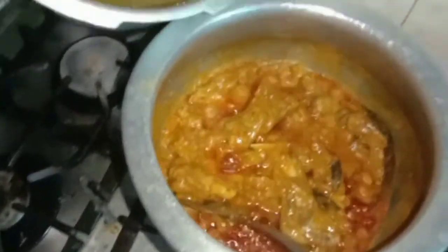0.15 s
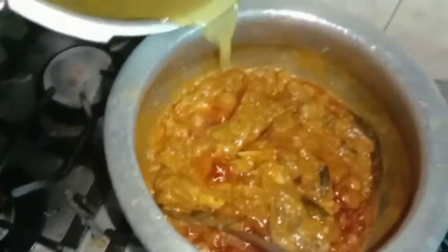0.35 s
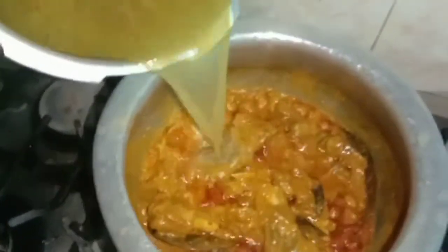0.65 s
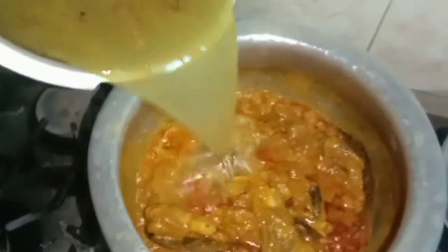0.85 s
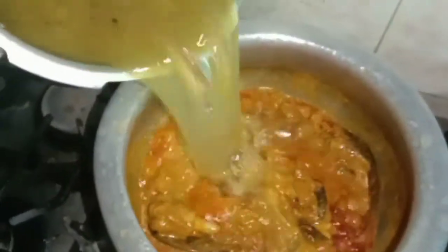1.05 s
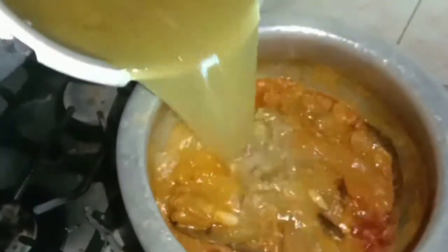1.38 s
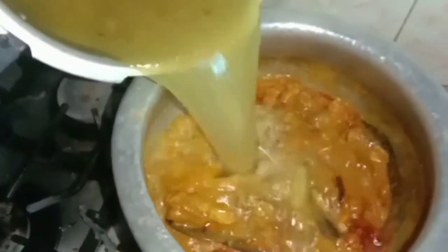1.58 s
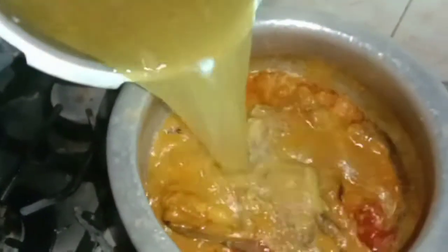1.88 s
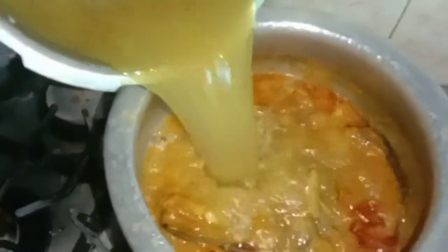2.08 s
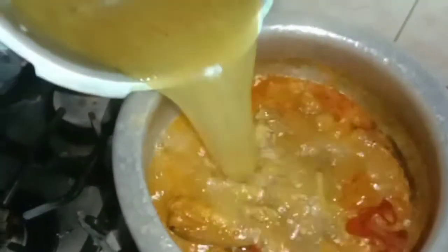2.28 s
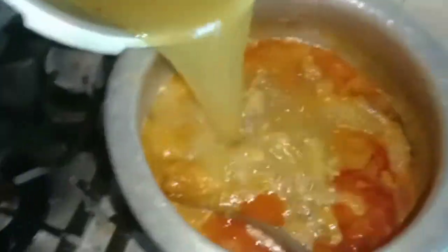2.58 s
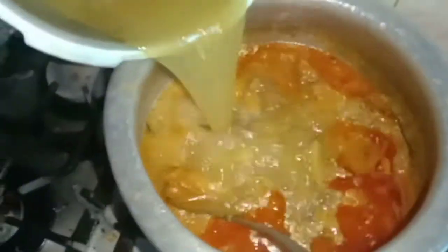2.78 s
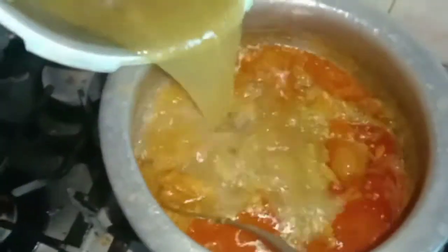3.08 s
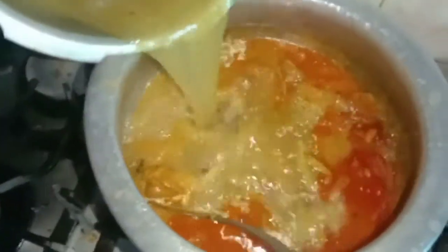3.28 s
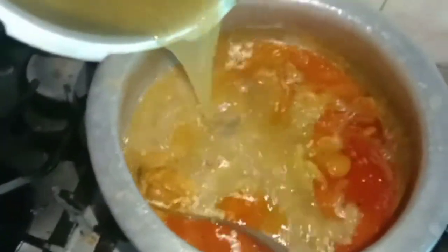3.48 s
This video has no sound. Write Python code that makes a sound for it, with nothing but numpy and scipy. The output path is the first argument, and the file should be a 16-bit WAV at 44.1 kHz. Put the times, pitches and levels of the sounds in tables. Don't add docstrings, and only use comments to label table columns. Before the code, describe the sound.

Broth poured into a metal pot of gravy starts as thin hiss and small bubbles, swells into dense crackling fizz after one second, then ends with a bowl-on-rim clank; close microphone in a home kitchen.

```python
import sys
import numpy as np
from scipy import signal
from scipy.fft import rfft, irfft
from scipy.io import wavfile
from scipy.ndimage import uniform_filter1d

SR = 44100
rng = np.random.default_rng(int(sys.argv[2]) if len(sys.argv) > 2 else 0)


def ratio(d):
    e = np.asarray(d, float) / 20
    return 10 ** e


def dump(signal):
    limited = np.clip(np.atleast_2d(signal).T, -1, 1)
    pcm = np.round(limited * 32767).astype(np.int16)
    wavfile.write(sys.argv[1], SR, pcm)


N = 160965
TIME = np.arange(N) / SR

# (frequency [Hz], level [dB])
ROOM_SPECTRUM = [(30, -16), (102, -11.5), (300, -19), (520, -19.5), (800, -20.5), (1300, -7.5), (1750, -22),
                 (2300, -31)]
# (time [s], level [dB], frequency [Hz], spell [s])
THUDS = [(0.0, -45, 117.4, 0.03), (.14, -42.5, 120.4, 0.058), (1.72, -49, 116.5, 0.23),
         (1.85, -42.5, 105, 0.02), (2.0, -55, 96, 0.07), (2.2, -53, 75, 0.034), (.34, -50.5, 216, 0.032),
         (2.77, -47, 118.2, 0.11), (2.9, -50, 97.7, 0.16), (3.49, -42, 117, 0.077)]
# (frequency [Hz], width [Hz], level [dB])
WALL_MODES = [(515.4, 48, -10.5), (1004, 28, -11), (1180, 37, -2.5), (1450, 39, -2.5), (2025, 97, -6.5)]
# (time [s], level [dB], frequency [Hz], spell [s])
HUMS = [(2.0, -35.5, 984, 0.13), (.01, -39, 1179, 0.12), (.2, -37.5, 487, .12), (.21, -29.5, 1225, 0.041),
        (.35, -35, 1590, 0.026), (.385, -40, 1550, 0.03), (.41, -40, 516, 0.09), (.73, -29.5, 1526, 0.032),
        (.73, -36, 1154, 0.032), (1.0, -38.5, 1180, 0.16), (1.19, -25, 1235, 0.014), (1.2, -34.5, 978, 0.2),
        (1.27, -30, 1474, 0.11), (1.4, -36.5, 521, .12), (1.505, -33, 964, 0.12),
        (1.67, -30.5, 1426, 0.056), (1.78, -32.5, 1182, 0.045), (2.008, -30.5, 1450, 0.021),
        (2.06, -35.5, 515, 0.028), (2.17, -37, 520, 0.087), (2.17, -34, 1180, 0.068),
        (2.385, -32, 985, 0.026), (2.439, -19.5, 1913, 0.0051), (2.925, -34, 1180, 0.023)]
# (time [s], level [dB], start frequency [Hz], end frequency [Hz], spell [s])
STEAM_POCKETS = [
    (.311, -27, 1750, 1330, .04),
    (.449, -32, 2600, 2050, .025),
    (.87, -25, 2600, 2000, .035),
    (1.68, -33, 1000, 1200, .04),
]
POCKET_SETTLING = [.03, .012, .006, .03]
# (frequency [Hz], level [dB], decay time T60 [s])
POT_MODES = [(138.7, -3, 0.37), (168.5, -1, 0.25), (217, 0.5, 0.31), (534, -5, 0.84), (665, -4.5, 0.63),
             (736, 9, 0.091), (947, -13, .2), (1043, 6.5, 0.16), (1084, -3, 0.56), (1143, 6, 0.18),
             (1270, 5.5, 0.11), (1365, -7.5, 0.62), (1633, -5, 0.23), (1590, -3.5, 0.14)]
# (frequency [Hz], level [dB], decay time T60 [s])
BOWL_MODES = [(2541, -20, .6), (2923, -9, .15), (3219, -13, .3), (4145, -9, .28), (4791, -17, .26),
              (4998, -12, 1.5), (5502, -13, .35), (6300, -14, .4), (7700, -20, .5), (9400, -27, .4)]
# (frequency [Hz], level [dB])
CLATTER_SPECTRUM = [(70, -1.5), (150, -4.5), (300, -9.5), (700, -1.5), (1200, -9), (2000, -15.5),
                    (5000, -17.5), (9000, -36.5)]
# (time [s], level [dB], frequency [Hz])
SMALL_BUBBLES = [(0.4258, -19.5, 5640), (0.5253, -20, 5650), (0.6445, -13, 5780), (1.3193, -9, 6080),
                 (1.618, -12.5, 5750), (1.9066, -14.5, 4740), (1.9325, -11.5, 6380), (2.211, -12.5, 6140),
                 (2.3606, -19, 5800), (2.602, -14.5, 5900), (2.7102, -15, 6600), (2.7233, -14, 5770),
                 (3.028, -16.5, 5870), (3.1595, -17.5, 6400), (3.1824, -16, 6330), (3.4324, -17, 5470),
                 (3.48, -15, 5380)]
# (time [s], level [dB], frequency [Hz])
MIDDLING_BUBBLES = [(0.0788, -22, 2980), (0.136, -17, 3070), (0.3726, -24.5, 2940), (0.738, -20, 3130),
                    (0.869, -21, 2660), (0.913, -27, 2640), (1.1228, -18, 3200), (1.1695, -21.5, 3160),
                    (1.23, -12, 3460), (1.5836, -14.5, 3130), (1.713, -13, 3280), (1.7796, -19.5, 3350),
                    (1.8657, -20.5, 2640), (1.9224, -15.5, 2640), (1.9402, -21, 2800),
                    (1.9653, -12.5, 2880), (2.0333, -15, 2770), (2.0504, -17.5, 2700),
                    (2.0787, -14.5, 3340), (2.092, -14, 3400), (2.1056, -15.5, 3230), (2.235, -17, 2700),
                    (2.2658, -14, 3080), (2.4506, -16, 2660), (2.4774, -14.5, 2850), (2.5314, -19.5, 2880),
                    (2.5775, -18, 3290), (2.615, -13.5, 2820), (2.6627, -16.5, 3480), (2.772, -16.5, 3030),
                    (2.864, -16.5, 2910), (2.8986, -14.5, 2930), (2.9706, -21.5, 2580), (3.0709, -17, 3100),
                    (3.2111, -14.5, 2730), (3.2538, -19.5, 2910), (3.405, -20.5, 2870), (3.418, -14, 2920)]
# (time [s], level [dB], frequency [Hz], spray level [dB])
BURSTS = [(0.1858, -12, 6600, -12.5), (0.3105, -9.5, 5550, -27), (0.6237, -12, 5800, -24),
          (0.7514, -9.5, 3260, -31), (1.005, -7.5, 3300, -24), (1.0919, -7.5, 5600, -16.5),
          (1.3003, -18, 5540, -20), (1.4625, -9, 5700, -17.5), (1.5662, -9.5, 6070, -7.5),
          (1.6335, -13, 6100, -22), (1.9067, -14, 2800, -26), (1.9924, -7.5, 3260, -32),
          (2.1877, -26, 3320, -20), (2.219, -6.5, 6220, -20), (2.3766, -4.5, 6100, -26),
          (2.3858, -4.5, 6400, -30), (2.564, -16.5, 3340, -30), (2.6956, -5.5, 3460, -30),
          (3.057, -15.5, 2980, -6), (3.0972, -18, 2700, -21), (3.4115, -10, 6290, -21),
          (3.493, -8, 5100, -20)]
# (time [s], fizz level [dB], spray level [dB])
BOIL = [(0, -33, -2.5), (.15, -28.5, -4.5), (.27, -32.5, -8), (.45, -32.5, -4.5), (.58, -33, -2.5),
        (.64, -31.5, -1.5), (.95, -27, -6), (1.2, -22.5, -5), (1.33, -17, -11), (1.46, -25.5, -3.5),
        (1.67, -22.5, -6.5), (2.3, -26.5, -5), (2.75, -27, -7), (3.2, -27, -7.5), (3.3, -34.5, -6.5),
        (3.46, -28, -5), (3.54, -28, -9), (3.6, -33.5, -11)]
# (frequency [Hz], level [dB])
FIZZ_SPECTRUM = [(1700, -7.5), (2300, -9), (3100, -1.5), (4300, -8), (6000, 0), (9200, -20.5), (14800, -3),
                 (15500, -13)]
# (time [s], level [dB])
FROTH_SHARE = [
    (.9, 0.5),
    (1.6, 0.5),
    (2.8, 2.5),
]
# (frequency [Hz], width [Hz], share [1], growth with filling [dB per dB])
AIR_CAVITY = [(2599, 205, 0.65, 2.95), (3200, 250, 0.96, -.7)]
# (time [s], half length [s], level [dB])
LULLS = [
    (0.603, 0.027, -5),
    (3.27, 0.024, -2),
]
# (frequency [Hz], width [Hz], share [1])
BAND_DIP = (4250, 360, 0.41)


def evened(x):
    return x / np.sqrt(np.mean(x ** 2) + 1e-20)


def noise(count=N):
    return rng.standard_normal(count)


def coloured(x, spectrum):
    hz = np.fft.rfftfreq(len(x), 1 / SR)
    f, db = np.transpose(spectrum)
    gain = ratio(np.interp(np.log(hz + 1), np.log(f + 1), db))
    return irfft(rfft(x) * gain, len(x))


def band(x, lo_hz, hi_hz):
    edges = [lo_hz, min(hi_hz, SR / 2.1)]
    return signal.sosfilt(signal.butter(3, edges, "band", fs=SR, output="sos"), x)


def resonate(x, hz, width):
    turn = np.exp(2j * np.pi * np.cumsum(hz * np.ones(len(x))) / SR)
    r = np.exp(-np.pi * abs(width) / SR)
    return 2 * (turn * signal.lfilter([1 - r], [1, -r], x / turn)).real


def drift(per_s):
    size = max(int(SR / per_s), 2)
    slow = uniform_filter1d(noise(), size, mode="wrap")
    slow = uniform_filter1d(slow, size, mode="wrap")
    return evened(slow - uniform_filter1d(slow, 5 * size))


def add(mix, s, sound):
    part = mix[round(s * SR):][:len(sound)]
    part += sound[:len(part)]


def room():
    return ratio(-50.5) * evened(coloured(noise(), ROOM_SPECTRUM + [(3000, -56)]))


def stove_rumble():
    return ratio(-58.5 + 1.7 * drift(6.4)) * evened(band(noise(), 27, 104)) * (TIME > 2.2)


def driven_spells(rows, width, rise_s, t60, lift_db):
    out, t = np.zeros(N), np.arange(16000) / SR
    for s, db, hz, spell in rows:
        envelope = np.minimum(t / rise_s, 1) * ratio(-60 * np.maximum(t - spell, 0) / t60)
        waver = hz * (1 + 0.0143 * evened(uniform_filter1d(noise(len(t)), size=1200)))
        tone = 0.99 * np.sin(2 * np.pi * np.cumsum(waver) / SR)
        rough = resonate(resonate(noise(len(t)), waver, width * hz), waver, width * hz)
        add(out, s, ratio(db + lift_db) * envelope * (tone + 0.69 * evened(rough)))
    return out


def stove_thuds():
    return driven_spells(THUDS, width=0.52, rise_s=0.0052, t60=0.32, lift_db=0.0)


def walls():
    hum = np.zeros(N)
    for hz, width, db in WALL_MODES:
        wander = hz * (1 + 0.021 * drift(7.6))
        mode = resonate(resonate(noise(), wander, width), wander, 3 * width)
        hum += ratio(db + 2.1 * drift(47)) * evened(mode)
    drowned = np.clip((TIME - 2.2) / 0.092, 0, 1)
    return hum * ratio(-50 - 3 * drowned)


def wall_hums():
    return driven_spells(HUMS, width=0.081, rise_s=0.0011, t60=0.099, lift_db=-9.0)


def steam_pockets():
    out, t = np.zeros(N), np.arange(5000) / SR
    for (s, db, from_hz, to_hz, spell), settle in zip(STEAM_POCKETS, POCKET_SETTLING):
        hz = to_hz + (from_hz - to_hz) * np.exp(-t / settle)
        tone = np.sin(2 * np.pi * np.cumsum(hz) / SR) + 0.5 * evened(resonate(noise(len(t)), hz, 150))
        envelope = np.minimum(t / 0.002, 1) * ratio(-60 * np.maximum(t - spell, 0) / 0.07)
        add(out, s, ratio(db) * envelope * tone)
    return out


def ringing(modes, t):
    return sum(ratio(-20 + db - 60 * t / t60) * np.sin(2 * np.pi * hz * t) for hz, db, t60 in modes)


def bowl_knock():
    out, t = np.zeros(N), np.arange(8000) / SR
    knock_s, bounce_s = 3.5445, 0.048
    bowl = ringing(BOWL_MODES, t)
    clatter = ratio(-16 - 60 * t / 0.53) * evened(coloured(noise(len(t)), CLATTER_SPECTRUM))
    add(out, knock_s, np.minimum(t / 0.0042, 1) * (ringing(POT_MODES, t) + bowl + clatter))
    add(out, knock_s + bounce_s, ratio(-6) * bowl)
    return band(out, 87, 14000)


def single_bubbles(rows, cycles, lift_db):
    out, t = np.zeros(N), np.arange(1500) / SR
    for s, db, hz in rows:
        u = t * hz / cycles
        ring = u * np.exp(1 - u) * np.sin(2 * np.pi * hz * t)
        fizz_tail = np.minimum(u, 1) * ratio(-60 * t / 0.077) * evened(resonate(noise(len(t)), hz, 440))
        add(out, s, ratio(db + lift_db) * (ring + 0.31 * fizz_tail))
    return out


def bursts():
    out, t = np.zeros(N), np.arange(4000) / SR
    for s, db, hz, spray_db in BURSTS:
        ping = np.minimum(t / 0.0015, 1) * ratio(-60 * t / 0.025) * np.sin(2 * np.pi * hz * t)
        snap = ratio(-60 * t / 0.0068) * np.sin(2 * np.pi * 14000 * t)
        spray = ratio(-9.5 - 60 * t / 0.092) * evened(band(noise(len(t)), 12150, 18000))
        spit = ratio(spray_db + 14) * (snap + spray)
        spurts = noise(len(t)) * ratio(2.5 * evened(uniform_filter1d(noise(len(t)), 80)))
        broad = evened(coloured(band(spurts, 2170, 10900), FIZZ_SPECTRUM))
        tuned = evened(resonate(resonate(spurts, hz, 1240), hz, 1240))
        sputter = ratio(-7.5 - 60 * t / 0.1) * evened(0.89 * broad + tuned)
        add(out, s, ratio(db - 6.5) * (ping + spit + sputter))
    return out


def bubble_swarm(lo_hz, hi_hz, cycles, per_s, spread_db, clump):
    out, count = np.zeros(N), 20
    chance = per_s / count / SR * np.exp(clump * drift(25))
    for hz in np.geomspace(lo_hz, hi_hz, count):
        u = np.arange(900) / SR * hz / cycles
        chirp = np.sqrt(u) * np.exp(-3 * u) * np.sin(2 * np.pi * cycles * u * (1 + 0.024 * u))
        arrivals = ratio(spread_db * np.minimum(rng.exponential(1, N), 4)) * (rng.random(N) < chance)
        out += np.sqrt(hz) * signal.oaconvolve(arrivals, chirp)[:N]
    return evened(out)


def bubbles_and_steam(lo_hz, hi_hz, bubbles, hiss):
    steam = evened(band(noise(), lo_hz, hi_hz))
    return evened(coloured(bubbles + hiss * steam, FIZZ_SPECTRUM))


def froth(fizz_db, froth_db):
    source = bubbles_and_steam(1620, 4070, bubble_swarm(1837, 4098, 13, 900, 3.0, 0.5), hiss=0.96)
    mix = 1.56 * source
    for hz, width, share, growth in AIR_CAVITY:
        mix = mix + share * ratio(growth * froth_db) * evened(resonate(source, hz, width))
    mix = evened(mix)
    strong_boil = np.clip(ratio(1.44 * (fizz_db + 22.0)), 0, 1)
    low = signal.sosfiltfilt(signal.butter(4, 2350, fs=SR, output="sos"), mix)
    return mix - (1 - strong_boil) * low


def fizz():
    s, fizz_points, spray_points = np.transpose(BOIL)
    fizz_db, spray_db = np.interp(TIME, s, fizz_points), np.interp(TIME, s, spray_points)
    froth_db = np.interp(TIME, *np.transpose(FROTH_SHARE))
    surge = drift(22)
    large = froth(fizz_db, froth_db) * ratio(-6.0 + froth_db + 1.9 * drift(20) + 0.78 * surge)
    fine = bubbles_and_steam(3830, 9850, bubble_swarm(4405, 8460, 13.6, 900, 1.5, 0.87), hiss=1.0)
    fine = fine * ratio(-3 - froth_db + 0.25 * drift(20) + 0.97 * surge)
    spray = bubbles_and_steam(6560, 25500, bubble_swarm(10100, 10400, 2.6, 1500, 8.0, 0.96), hiss=2.3)
    spray = spray * ratio(spray_db + drift(25) + surge)
    return (large + fine + spray) * ratio(fizz_db - 1.5)


def patchy(x, depth_db):
    z = signal.stft(x, nperseg=512, noverlap=384)[2]
    field = uniform_filter1d(rng.standard_normal(z.shape[::-1]), size=20, axis=0, mode="wrap")
    field = uniform_filter1d(field, size=3, axis=1).T
    depth = depth_db * np.interp(np.arange(len(z)) / len(z), [0.25, 0.45], [1, 0.3])[:, None]
    gain = ratio(evened(field) * depth)
    gain = gain / np.sqrt(np.mean(gain ** 2))
    return signal.istft(z * gain, nperseg=512, noverlap=384)[1][:N]


def boiling():
    lull = ratio(sum(db * np.exp(-((TIME - s) / half) ** 2) for s, half, db in LULLS))
    boil = lull * (patchy(fizz() + room(), 3.25) + walls()) + bursts()
    dip_hz, dip_width, dip_share = BAND_DIP
    return boil - (1 - lull * (1 - dip_share)) * resonate(boil, dip_hz, dip_width)


def scene():
    mix = stove_rumble() + stove_thuds() + wall_hums() + steam_pockets() + bowl_knock()
    mix = mix + single_bubbles(SMALL_BUBBLES, cycles=5.3, lift_db=-4.5)
    mix = mix + single_bubbles(MIDDLING_BUBBLES, cycles=3.86, lift_db=-4)
    return (mix + boiling())[None]


def band_limit(x):
    return signal.sosfilt(signal.butter(12, 16790, fs=SR, output="sos"), x)


def record(dry):
    thin = signal.sosfilt(signal.butter(2, 70, "high", fs=SR, output="sos"), dry)
    lowpass = signal.firwin(1023, 15700, window=("kaiser", 9), fs=SR)
    finished = signal.oaconvolve(thin, lowpass[None], "same")
    return band_limit(finished)


dry = scene()
out = record(dry)
dump(out)
```